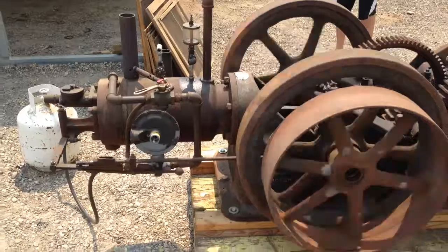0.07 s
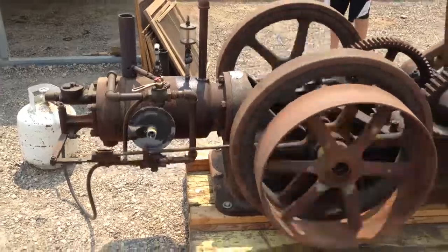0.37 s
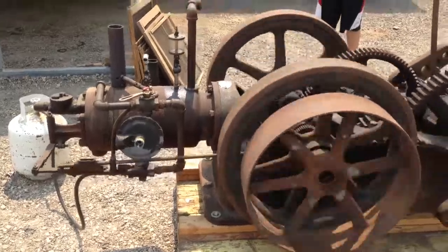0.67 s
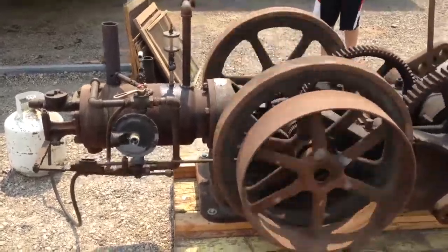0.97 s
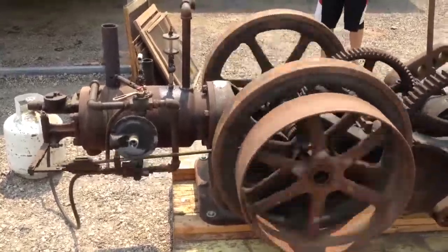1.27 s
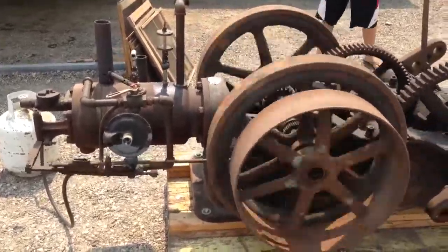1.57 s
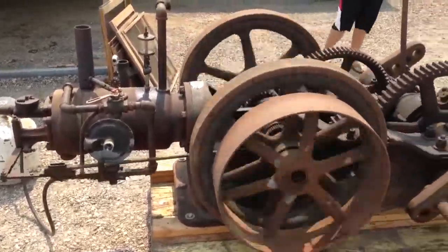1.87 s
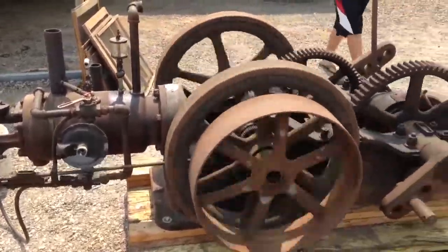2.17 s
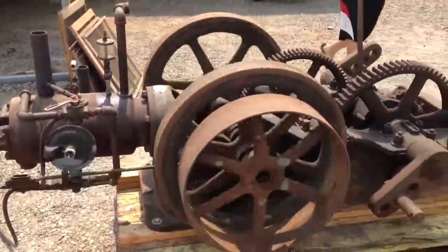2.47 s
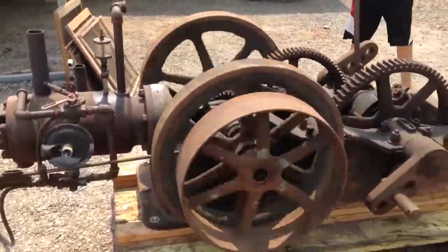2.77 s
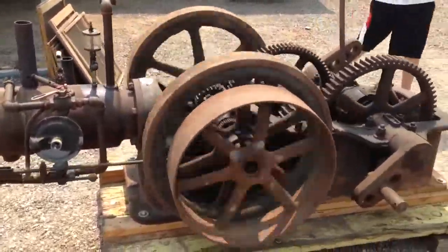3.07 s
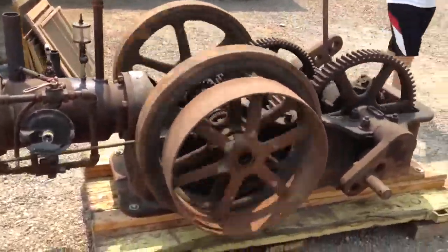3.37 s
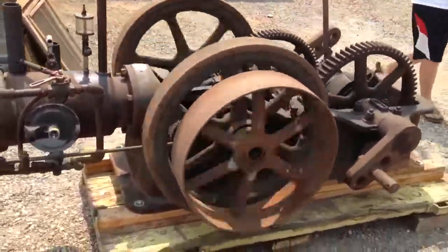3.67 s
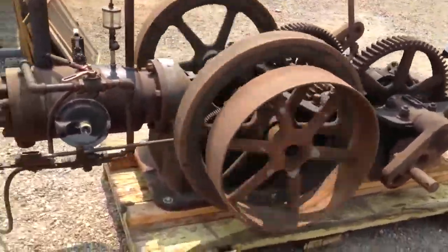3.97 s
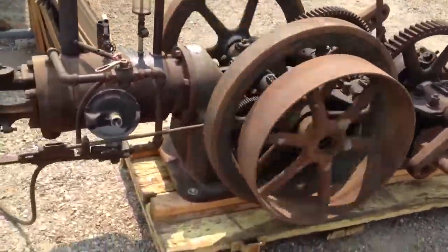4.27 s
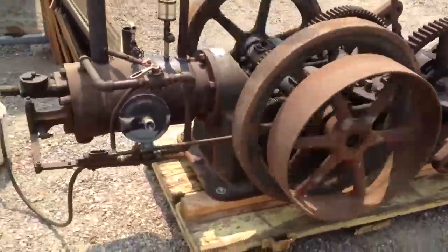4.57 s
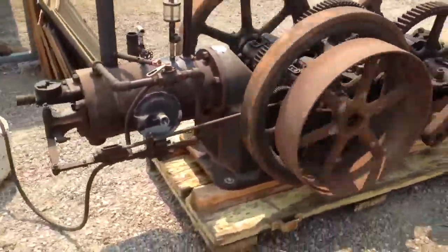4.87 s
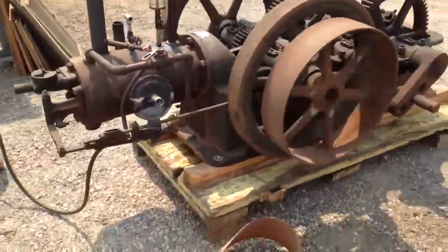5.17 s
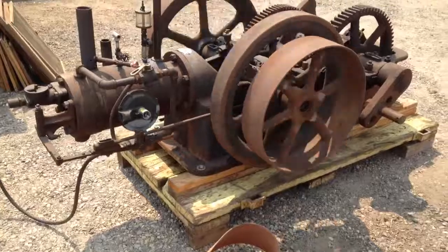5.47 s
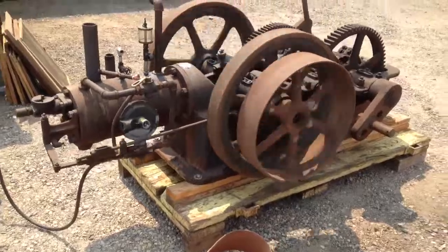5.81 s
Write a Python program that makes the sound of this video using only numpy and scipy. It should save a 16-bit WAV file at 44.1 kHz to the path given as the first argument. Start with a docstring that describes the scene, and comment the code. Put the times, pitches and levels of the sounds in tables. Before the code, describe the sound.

An antique single-cylinder gas engine runs slowly and steadily in an open yard, close to one microphone. Each cycle brings a sharp steel clack, a short chuff of air, then a booming knock and loud exhaust bark, about every one and a half seconds. Light valve ticks and soft puffs fill the gaps, while flywheels rumble and gears grind quietly underneath. Each bark leaves a brief echo.

```python
"""Antique gas engine in a yard

One microphone outdoors, by a single-cylinder engine that turns slowly on a timber skid. About every
1.45 s the charge knocks in the cylinder and the exhaust barks; between firings the valve gear ticks
and clinks and the piston drives out a chuff of air. Flywheels and gears rumble underneath, the yard
echoes, and the recorder's gain control ducks after every bark."""
import sys
import numpy as np
from scipy import signal
from scipy.fft import rfft, irfft
from scipy.io import wavfile
from scipy.ndimage import uniform_filter1d, minimum_filter1d

SR = 44100
rng = np.random.default_rng(int(sys.argv[2]) if len(sys.argv) > 2 else 0)


def put_to_file(sound):
    """Save the sound as 16-bit audio at rate SR, in the file named by the first command-line argument."""
    columns = np.atleast_2d(sound).T  # one column per channel
    safe = np.clip(columns, -1, 1)
    whole_steps = np.round(safe * 32767)
    wavfile.write(sys.argv[1], SR, whole_steps.astype(np.int16))


N = 257544
TIME = np.arange(N) / SR

# Start of each four-stroke cycle in seconds, counted from the exhaust.
CYCLE_STARTS = [-.252, 1.242, 2.672, 4.1215, 5.649, 7.18]
# Gas column of cylinder and stack. Each row: mode in Hz, level in dB, t60 in seconds.
CYLINDER_MODES = [(68.5, -35, 0.15), (146, -13, 0.14), (192.3, -9.5, 0.17), (322, -6, 0.17),
                  (346.2, -3, 0.14), (604, -17.5, 0.2), (906, -35, 0.034), (1940, -17.5, 0.1)]
# Resonances of the exhaust passage. Each row: centre in Hz, width in Hz, gain in dB.
EXHAUST_PASSAGE = [(617, 40, -15.5), (952, 30, -6), (1166, 62, -0.5), (1516, 44, -5), (1884, 46, 7),
                   (2000, 80, 0), (2360, 48, 2), (3570, 25, 4.5), (3930, 43, -5), (4376, 33, -3),
                   (4930, 110, 1), (5560, 60, -1), (5640, 50, -4.5), (6200, 90, -7)]


def amp(db):
    """Decibels to gain."""
    return 10 ** (np.asarray(db) / 20)


def rms_one(x):
    """Scale to unit rms."""
    return x / np.sqrt(np.mean(x ** 2) + 1e-20)


def band(x, low, high):
    """Butterworth band-pass."""
    return signal.sosfilt(signal.butter(2, [low, high], "band", fs=SR, output="sos"), x)


def coloured(x, colour):
    """Minimum-phase filter that follows a colour: rows of frequency in Hz, level in dB."""
    size = 8192
    hz, db = np.transpose(colour)
    grid = np.maximum(np.arange(size // 2 + 1) * SR / size, 1)
    cepstrum = irfft(np.log(amp(np.interp(np.log(grid), np.log(hz), db))))
    cepstrum[1:size // 2] *= 2
    cepstrum[size // 2 + 1:] = 0
    impulse = irfft(np.exp(rfft(cepstrum)))[:size // 2]
    return signal.fftconvolve(x, impulse)[:N]


def resonate(x, hz, width):
    """One resonance with gain 1 at its top."""
    r = np.exp(-np.pi * width / SR)
    poles = [1, -2 * r * np.cos(2 * np.pi * hz / SR), r * r]
    return signal.lfilter(np.array([1, 0, -1]) * (1 - r * r) / 2, poles, x)


def drift(rate):
    """Smooth random motion of rms 1, low-passed at rate Hz."""
    slow = signal.sosfilt(signal.butter(2, rate, fs=SR, output="sos"), rng.standard_normal(N + SR))
    return rms_one(slow[SR:])


def turbulence(colour, rough_db, rate):
    """Coloured noise of rms 1 that comes in uneven lumps."""
    return rms_one(coloured(rng.standard_normal(N) * amp(rough_db * drift(rate)), colour))


def jet(colour, resonances, rough_db, rate):
    """Sputtering noise of rms 1, heard both directly and through resonances."""
    flow = turbulence(colour, rough_db, rate)
    return rms_one(flow + sum(amp(db) * resonate(flow, hz, width) for hz, width, db in resonances))


def strike(times, levels_db, modes, vary_db):
    """Blows set decaying sines ringing, each mode at a slightly different level on each blow."""
    out, at = np.zeros(N), np.round(np.asarray(times) * SR).astype(int)
    for hz, db, t60 in modes:
        blows = np.full(N, 1e-18)
        blows[at] = amp(levels_db + db + vary_db * rng.standard_normal(len(at)))
        r, w = amp(-60 / (t60 * SR)), 2 * np.pi * hz / SR
        out += signal.lfilter([0, np.sin(w)], [1, -2 * r * np.cos(w), r * r], blows)
    return out


def burst(start, rise, hold, t60):
    """Envelope that rises, holds and dies away; all times in seconds."""
    out, first = np.zeros(N), int(start * SR)
    age = TIME[:min(N - first, SR // 2)]
    decay = np.exp(-np.log(1000) * np.maximum(age - rise - hold, 0) / t60)
    out[first:first + len(age)] = np.minimum(age / rise, 1) * decay
    return out


def every_cycle(rows):
    """Repeat rows in each cycle, turning their first column from share of the cycle to seconds."""
    events = [(start + share * (end - start), *rest)
              for start, end in zip(CYCLE_STARTS, CYCLE_STARTS[1:]) for share, *rest in rows]
    return [event for event in events if 0 <= event[0] < TIME[-1]]


def through_cycle(rows):
    """Follow each column as the engine turns; rows begin with their share of the cycle."""
    phase = np.interp(TIME, CYCLE_STARTS, np.arange(len(CYCLE_STARTS))) % 1
    shares, *columns = np.transpose(rows)
    return [np.interp(phase, shares, column) for column in columns]


def running_gear():
    """Flywheels shake the skid, gear teeth grind and ring, and the piston swishes with each stroke."""
    # Shaking, hardest as the piston turns round. Each row: share of the cycle, rumble in dB.
    shake = [(0, -35), (.15, -43.5), (.19, -32.5), (.28, -42), (.4, -41.5), (.5, -29.5), (.54, -38.5),
             (.65, -43), (.68, -30), (.72, -30), (.79, -38.5), (.92, -39.5), (.95, -34.5), (1, -26)]
    # Friction. Each row: share of the cycle, gear mesh in dB, sliding hiss in dB.
    friction = [(0, -45.5, -58), (.15, -39.5, -67.5), (.2, -45, -54), (.25, -44.5, -57), (.29, -46.5, -71),
                (.34, -43.5, -65), (.39, -43.5, -54), (.44, -43.5, -57.5), (.55, -40.5, -104),
                (.62, -43, -54.5), (.66, -38.5, -49.5), (.76, -39, -62), (.81, -41, -70), (.86, -40.5, -67),
                (.89, -39.5, -50), (.96, -37.5, -54.5), (1, -64, -41.5)]
    # Spectra of the three noises. Each row: frequency in Hz, level in dB.
    rumble_colour = [(25, -21), (60, -6.5), (110, -2.5), (155, 1), (240, -3), (360, -1), (480, -13.5),
                     (700, -16.5), (1400, -18.5), (2300, -32), (3000, -49.5)]
    mesh_colour = [(300, -17.5), (700, -8.5), (825, -1), (950, -6.5), (1300, -13.5), (1650, -20.5),
                   (2050, -14), (2420, -20.5), (2750, -28), (4000, -58.5)]
    hiss_colour = [(2000, -8), (3100, 2), (5000, 2), (7000, -2.5), (9000, -3), (12000, -8.5),
                   (15500, -13.5)]
    # Ringing of gear wheels and sliding iron. Each row: centre in Hz, width in Hz, gain in dB.
    gear_rings = [(823, 62, 2.5), (1360, 51, -2.5), (2032, 96, 0.5)]
    slide_rings = [(3590, 41, 0), (4200, 78, 1.5), (4970, 110, 0.5), (6300, 90, 1.5), (7500, 130, 2),
                   (8520, 110, 7), (9800, 140, -14), (11700, 150, -17)]
    rumble_db, = through_cycle(shake)
    mesh_db, hiss_db = through_cycle(friction)
    swish = amp(hiss_db) * jet(hiss_colour, slide_rings, rough_db=2, rate=250)
    rumble = amp(rumble_db) * turbulence(rumble_colour, rough_db=2, rate=29.4)
    grind = amp(mesh_db) * jet(mesh_colour, gear_rings, rough_db=3, rate=77)
    return rumble + grind + swish


def valve_puffs(t60=0.092):
    """Air puffs softly at the valves in every cycle."""
    # Each row: share of the cycle, level in dB, rise and hold in seconds.
    puffs = [(.18, -44.5, 0.011, 0.073), (.471, -35, 0.008, 0.048), (.558, -36, 0.017, .012)]
    colour = [(200, -19), (1400, 8), (2300, 0), (2850, -3),
              (4000, -6.5), (6500, -13), (9000, -16), (15000, -31)]
    resonances = [(1390, 40, 0.21), (2325, 52, 1.4), (3490, 39, 1.6), (4170, 160, 2)]
    flow = sum(amp(db) * burst(s, rise, hold, t60) for s, db, rise, hold in every_cycle(puffs))
    return flow * jet(colour, resonances, rough_db=3, rate=1200)


def push_rod(scuff_db=-16, ring_db=-14, rod_db=-15, vary_db=1, pitch_spread=0.07):
    """Each touch of cam and push rod scuffs at a slightly different pitch and faintly rings the rod."""
    # Contacts. Each row: share of the cycle, level in dB, brightest ring in Hz.
    ticks = [(.158, -26, 4350), (.271, -42.5, 4800), (.313, -36.5, 6160), (.6555, -29, 5400),
             (.772, -40, 4600), (.820, -31.5, 6240), (.826, -35, 5100), (.944, -41.5, 4500)]
    # The rod. Each row: mode in Hz, level in dB, t60 in seconds.
    rod_modes = [(2463, 5, 0.077), (3946, -7.5, 0.14), (5200, 4, 0.044), (6400, 1.5, 0.039),
                 (7900, 5, 0.017)]
    # Spectrum of the scuff. Each row: frequency in Hz, level in dB.
    scuff_colour = [(1000, -7), (2400, -4), (3200, 10.5), (4500, 13), (6500, 5.5), (9000, 4.5),
                    (15500, -15)]
    times, levels_db, pitches = np.transpose(every_cycle(ticks))
    force, landing = rng.standard_normal((len(times), 2)).T
    levels_db = levels_db + vary_db * force
    pitches = pitches * np.exp(pitch_spread * landing)
    out = strike(times, levels_db + rod_db, rod_modes, vary_db=3)
    grit = turbulence(scuff_colour, rough_db=3, rate=500)
    for s, db, hz in zip(times, levels_db, pitches):
        scuff = amp(scuff_db) * grit + amp(ring_db) * rms_one(resonate(grit, hz, width=220))
        out += amp(db) * burst(s, 0.00069, 0.0059, t60=0.052) * scuff
    return out


def skid(t60=0.064):
    """The rocking engine thumps its timbers; each thump is one damped low note."""
    # Each row: share of the cycle, level in dB, pitch in Hz.
    thumps = [(.445, -27, 147), (.71, -20.5, 173), (.945, -23, 195)]
    return sum(strike([s], db, [(hz, 0, t60)], vary_db=2) for s, db, hz in every_cycle(thumps))


def latch(ring_hz=8597, ring_t60=0.11, bounce_s=0.02):
    """The steel valve latch drops and bounces once: a clack, one high ring and a thud in the frame."""
    # One drop a cycle. Each row: start in seconds, then clack, ring and thud in dB.
    drops = [(0.4861, -29, -28.5, -24), (1.953, -27, -32, -15.5), (3.3902, -29, -28.5, -14),
             (4.876, -27.5, -27.5, -14.5)]
    # The frame on its skid. Each row: mode in Hz, level in dB, t60 in seconds.
    frame_modes = [(176, -33, 0.051), (334, -14.5, 0.077), (379, -2, 0.078), (770, -31.5, 0.071)]
    # Spectrum of the clack. Each row: frequency in Hz, level in dB.
    clack_colour = [(150, 1.5), (1400, 9), (2800, 6.5), (4800, 13), (6500, 2), (8500, -2), (15500, -8)]
    bounces = np.array(drops) + [bounce_s, -7, -24, -6.5]   # later and weaker
    times, clack_db, ring_db, thud_db = np.vstack([drops, bounces]).T
    clack = sum(amp(db) * burst(s, 0.00023, 0.00046, t60=0.054) for s, db in zip(times, clack_db))
    ring = strike(times, ring_db, [(ring_hz, 0, ring_t60)], vary_db=2)
    thud = strike(times, thud_db, frame_modes, vary_db=1)
    return clack * turbulence(clack_colour, rough_db=-2.5, rate=290) + ring + thud


def chuffs(after_db=-14):
    """The piston drives air out of the port in one short rush and a duller afterflow."""
    # Each row: start in seconds, level in dB, body at 900 Hz in dB, edge at 2300 Hz in dB.
    strokes = [(0.75, -13, 1, -8), (2.203, -14.5, 3.5, 2), (3.646, -16, -11, 1), (5.148, -17.5, 2, -4.5)]
    # Spectrum of the rush. Each row: frequency in Hz, level in dB.
    rush_colour = [(100, -17), (500, -10), (1000, -2.5), (2400, -1), (2720, -12), (3200, -8.5), (4200, -10),
                   (5500, -13.5), (7000, -12), (10000, -17.5), (15500, -23)]
    # Resonances of the air port. Each row: centre in Hz, width in Hz, gain in dB.
    port = [(360, 87, 6.5), (830, 44, 4.5), (1019, 66, 9), (1288, 20, 16), (1950, 31, 0), (2290, 23, 10.5),
            (3300, 83, 2.5), (4200, 33, 16.5), (4560, 53, 4), (4830, 99, 8), (6340, 120, -14),
            (7940, 120, 10.5)]
    dull_colour = [(200, -10), (700, -4), (1300, 6.5), (2300, -2.5),
                   (2900, -6.5), (4000, -21), (12000, -28)]
    air = jet(rush_colour, port, rough_db=2.5, rate=700)
    dull_air = turbulence(dull_colour, rough_db=1.5, rate=91)
    out = np.zeros(N)
    for s, db, body_db, edge_db in strokes:
        rush = coloured(air, [(500, 0), (900, body_db), (1500, 0), (2300, edge_db), (3200, 0)])
        out += amp(db) * burst(s, 0.0077, 0.0097, t60=0.057) * rush
        out += amp(db + after_db) * burst(s, 0.027, 0.019, t60=0.22) * dull_air
    return out


def knocks(rattle_db=-8, burn_db=-17):
    """Ignition booms in the cylinder with a sharp crack; the charge burns on and loose parts rattle."""
    # Two or three knocks a firing. Each row: start in seconds, boom in dB, crack in dB.
    blows = [(1.179, -24, -28.5), (1.2045, -4.5, -9), (1.222, -12, -36), (2.5951, -20, -46),
             (2.6346, -5, -14), (2.6521, -15.5, -18), (4.0826, -15.5, -30), (4.102, -33, -53),
             (5.558, -47, -57), (5.6109, 0.5, -8.5), (5.63, -4, -37)]
    # Spectrum of the crack. Each row: frequency in Hz, level in dB.
    crack_colour = [(60, -30), (400, -8), (1000, 6.5), (2100, 5.5), (2800, -30), (4000, 0.5), (7000, -4.5),
                    (15500, -9)]
    rattle_colour = [(200, -13), (950, 15), (1400, -5), (1900, 2),
                     (2800, -3), (4000, -6.5), (7000, -16), (15000, -25)]
    burn_colour = [(40, -10), (100, -11), (160, 22.5), (230, -9.5),
                   (330, 17.5), (480, -29), (1500, -34.5)]
    times, boom_db, _ = np.transpose(blows)
    boom = -strike(times, boom_db, CYLINDER_MODES, vary_db=1)
    crack = sum(amp(db) * burst(s, 0.0017, 0.0047, t60=0.032) for s, _, db in blows)
    rattle = sum(amp(db + rattle_db) * burst(s, 0.0066, 0.0089, t60=0.11) for s, _, db in blows)
    burn = sum(amp(db + burn_db) * burst(s, 0.0057, 0.043, t60=0.066) for s, db, _ in blows)
    return (boom + crack * turbulence(crack_colour, rough_db=-6, rate=157)
            + rattle * turbulence(rattle_colour, rough_db=-3.5, rate=650)
            + burn * turbulence(burn_colour, rough_db=-2, rate=270))


def barks(t60_scale=0.52, opening_db=-11):
    """The exhaust valve cracks open and thumps the gas column; then a jet roars through the passage."""
    # Each row: start in seconds, gas in dB, thump in dB, hold in seconds, treble in dB.
    openings = [(1.243, -3, -2, 0.0063, -3.5), (2.676, 2, -1.5, 0.002, -2.5),
                (4.121, 2.5, 5.5, 0.0084, 0.5), (5.651, 1, 3, 0.0058, -4.5)]
    # Spectrum of the jet. Each row: frequency in Hz, level in dB.
    gas_colour = [(60, -5), (500, -4), (850, 3.5), (1200, 5), (2300, 1), (2550, -0.5), (2880, -4.5),
                  (3700, 3.5), (5200, 3), (7000, -1), (11000, -5), (15500, -9)]
    times, _, thump_db = np.transpose(openings)[:3]
    damped = [(hz, db, t60 * t60_scale) for hz, db, t60 in CYLINDER_MODES]
    out = -strike(times, thump_db, damped, vary_db=1)
    gas = jet(gas_colour, EXHAUST_PASSAGE, rough_db=0.5, rate=1800)
    for s, gas_db, _, hold, treble_db in openings:
        crack = amp(opening_db) * burst(s, 0.00079, 0.0017, t60=0.041)
        roar = burst(s, 0.018, hold, t60=0.051)
        treble = [(2500, 0.0065), (3200, treble_db), (6000, treble_db), (12000, 0.0039)]
        out += amp(gas_db) * (crack + roar) * coloured(gas, treble)
    return out


def whistles(wander=0.0284, flutter_db=-1.5):
    """Exhaust gas whistles on the valve edge, in tones that waver with the flow."""
    # Each row: start in seconds, pitch in Hz, level in dB, hold in seconds.
    edge_tones = [(1.256, 1536, -8, 0.0065), (1.25, 4280, -4.5, 0.0052), (2.601, 2460, -33, 0.022),
                  (2.682, 1176, -9, 0.013), (2.687, 1831, 3.5, 0.0047), (4.127, 1783, -4, 0.0042),
                  (4.132, 2320, -3.5, 0.012), (5.656, 1588, -4, 0.0033), (5.658, 2230, -27, 0.013)]
    wavering_time = np.cumsum(1 + wander * drift(142.6)) / SR
    tones = sum(amp(db) * burst(s, 0.01, hold, t60=0.017) * np.sin(2 * np.pi * hz * wavering_time)
                for s, hz, db, hold in edge_tones)
    return tones * amp(flutter_db * drift(360))


def yard(x, echo_s=0.034, echo_db=-17, build_s=0.012, ring_db=-3):
    """A nearby wall slaps back at the microphone; a diffuse wash dies away in the exhaust's colour."""
    # The wall's reflection. Each row: frequency in Hz, gain in dB.
    wall_colour = [(60, -27.5), (500, -15.5), (1200, 6), (2300, -1.5), (4000, 0.5), (7000, -1.5),
                   (15500, -7)]
    # Scattered sound. Each row: frequency in Hz, level in dB, t60 in seconds.
    scatter = [(150, -50, 0.12), (600, -18.5, 0.32), (1400, -16.5, 0.42), (2400, -16.5, 0.41),
               (4050, -15, 0.44), (7300, -23.5, 0.4), (12800, -22, 0.21)]
    out = amp(echo_db) * coloured(np.interp(TIME - echo_s, TIME, x, left=0), wall_colour)
    table_hz, *columns = np.transpose(scatter)
    edges = np.geomspace(200, 16000, 11)
    late = np.interp(TIME - build_s, TIME, x, left=0)
    white = rng.standard_normal((2, N))
    ringing = sum(amp(db) * resonate(white, hz, width) for hz, width, db in EXHAUST_PASSAGE)
    wash = white + amp(ring_db) * ringing
    for k, (low, high) in enumerate(zip(edges, edges[1:])):
        db, t60 = [np.interp(np.log(low * high) / 2, np.log(table_hz), column) for column in columns]
        # each band's power builds up quickly and leaks away slowly
        rise, fall = np.exp(-1 / (build_s * SR)), np.exp(-2 * np.log(1000) / (t60 * SR))
        arriving = band(late, low, high) ** 2 + 1e-18
        power = signal.lfilter([(1 - rise) * (1 - fall)], np.poly([rise, fall]), arriving)
        out += amp(db) * np.sqrt(np.abs(power)) * rms_one(band(wash[k % 2], low, high))
    return out


def scene():
    """The engine at the microphone, in mono; the yard answers all but the skid and running gear."""
    blows = knocks() + barks() + whistles() + chuffs() + valve_puffs() + latch() + push_rod()
    return (blows + yard(blows) + skid() + running_gear())[None]


def gain_control(x, limit_db=-7, hold_s=0.17, release_db_per_s=95):
    """Loud sound pulls the recorder's gain down at once; it waits, then recovers."""
    power = np.maximum(uniform_filter1d(x ** 2, size=176), 1e-12)
    excess_db = np.maximum(10 * np.log10(power) - limit_db, 0)
    span = int(hold_s * SR) // 2
    held_db = -minimum_filter1d(-excess_db, 2 * span + 1, origin=span)
    recovery_db = release_db_per_s * TIME
    cut_db = np.maximum.accumulate(held_db + recovery_db) - recovery_db
    return x * amp(-uniform_filter1d(cut_db, size=88))


def record(dry, start_s=0.083, dip_hz=2730, dip_db=-8, low_cut_hz=55, high_cut_hz=15500):
    """The recorder opens after a moment, dips one narrow band, trims bass and top and rides the gain."""
    heard = dry[0] * np.clip((TIME - start_s) / 0.0039, 0, 1)
    heard = heard - (1 - amp(dip_db)) * resonate(heard, dip_hz, width=220)
    heard = signal.sosfilt(signal.butter(1, low_cut_hz, "high", fs=SR, output="sos"), heard)
    ducked = gain_control(heard)
    rounded = .95 * ducked / (1 + ducked ** 4) ** .25   # soft clipping
    return signal.sosfilt(signal.ellip(12, .1, 90, high_cut_hz, fs=SR, output="sos"), rounded)[None]


dry = scene()
out = record(dry)
put_to_file(out)
```